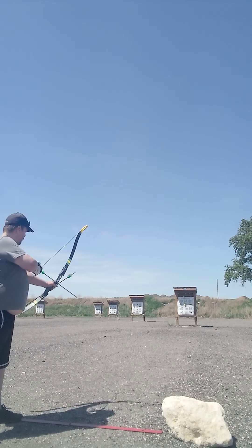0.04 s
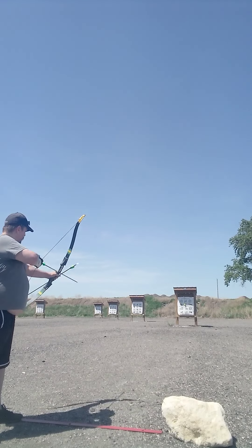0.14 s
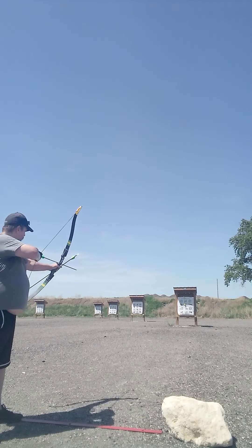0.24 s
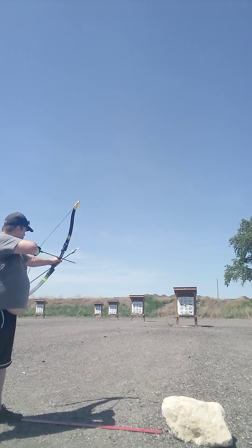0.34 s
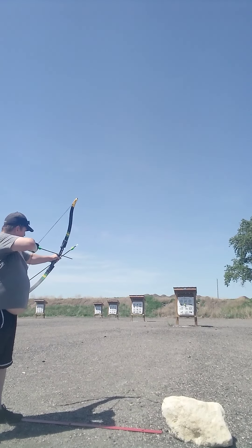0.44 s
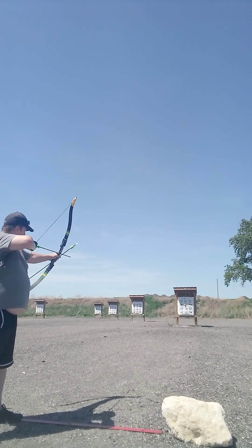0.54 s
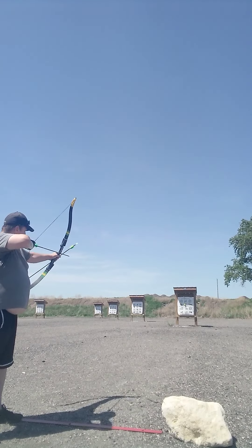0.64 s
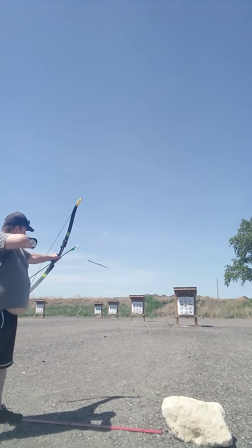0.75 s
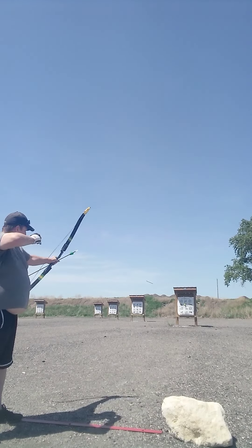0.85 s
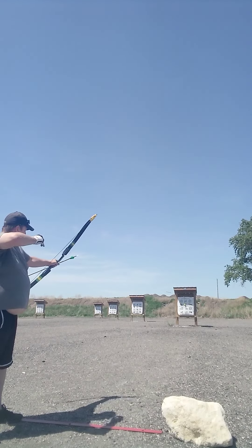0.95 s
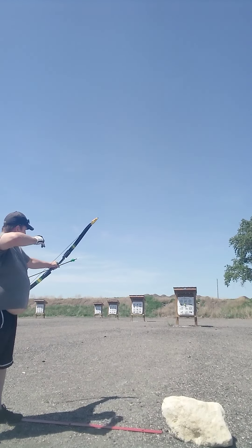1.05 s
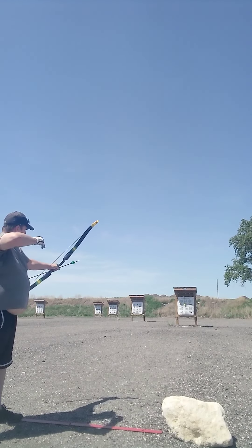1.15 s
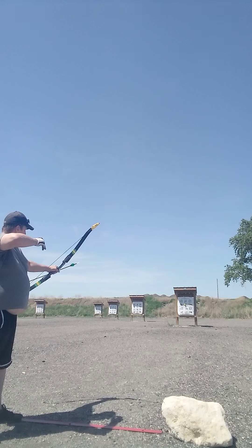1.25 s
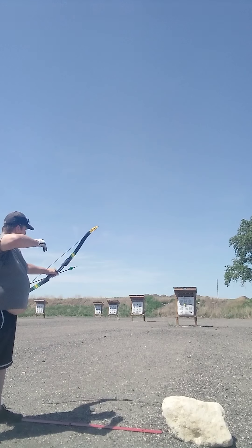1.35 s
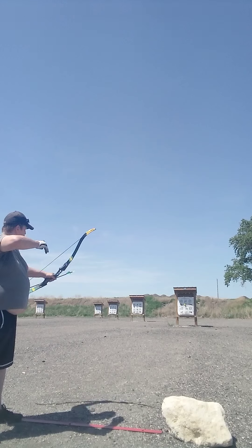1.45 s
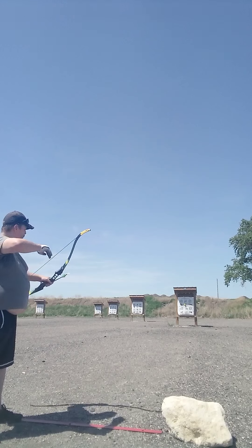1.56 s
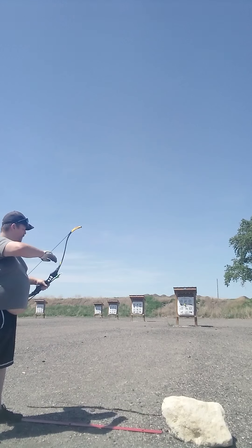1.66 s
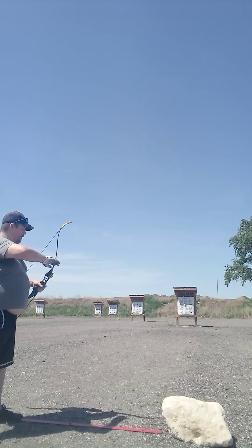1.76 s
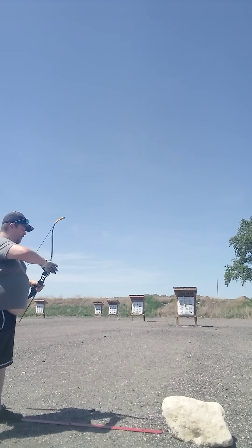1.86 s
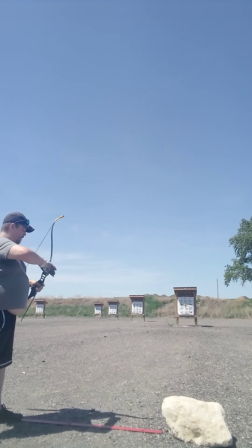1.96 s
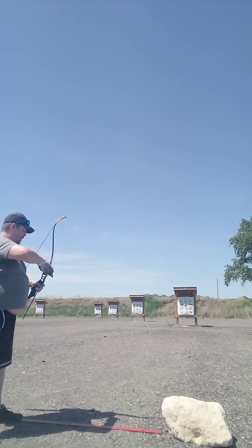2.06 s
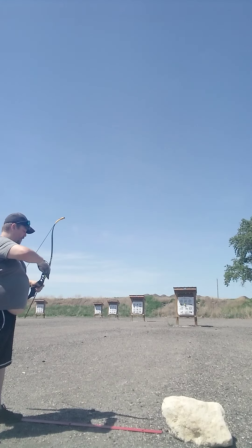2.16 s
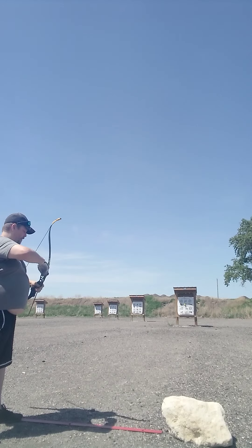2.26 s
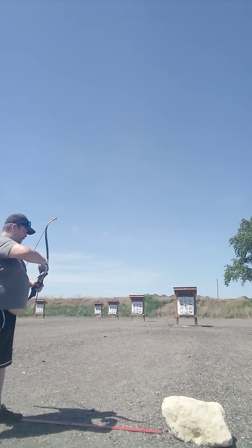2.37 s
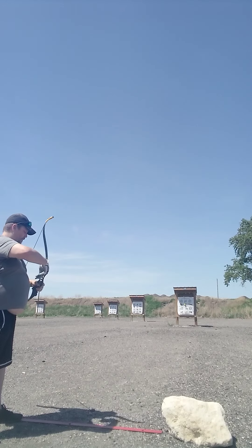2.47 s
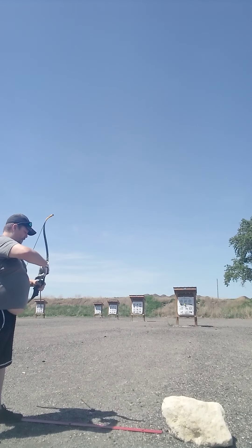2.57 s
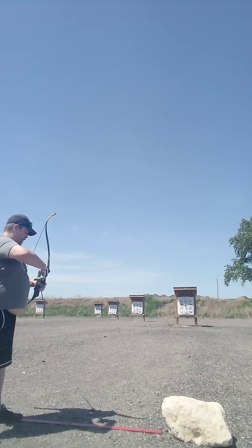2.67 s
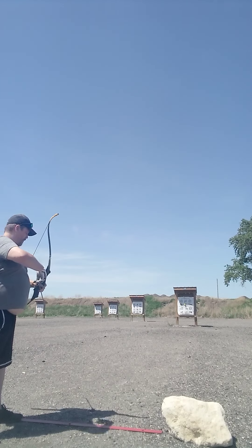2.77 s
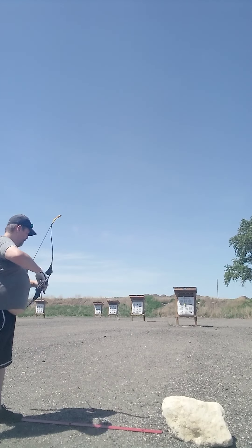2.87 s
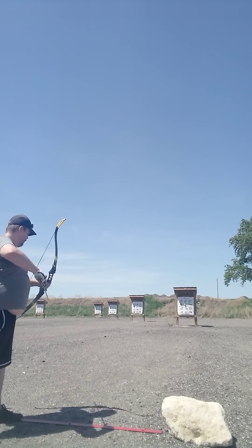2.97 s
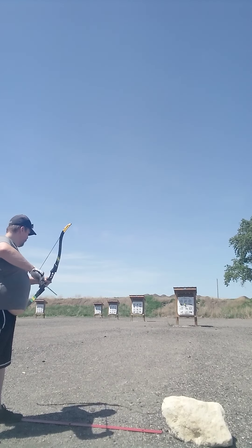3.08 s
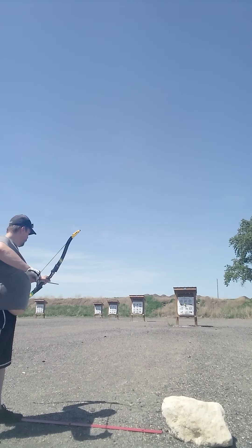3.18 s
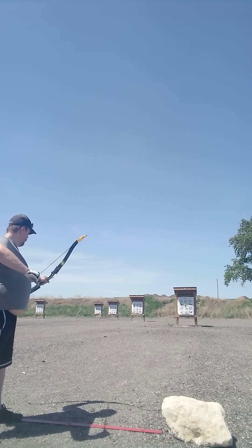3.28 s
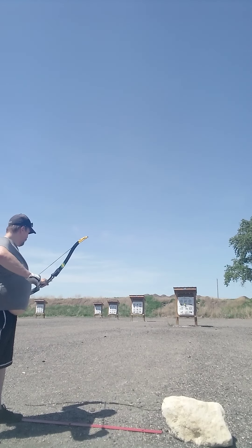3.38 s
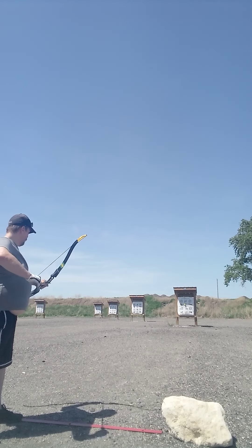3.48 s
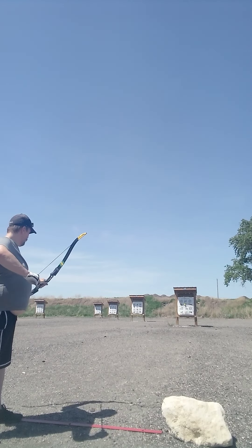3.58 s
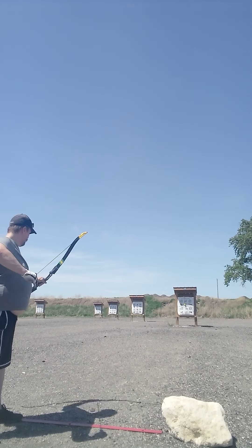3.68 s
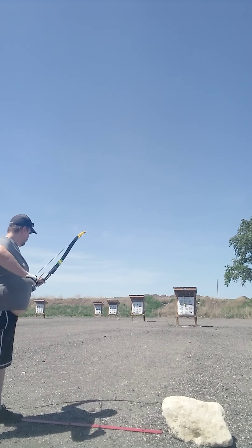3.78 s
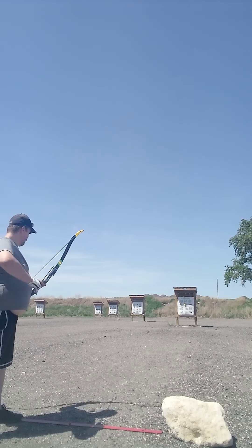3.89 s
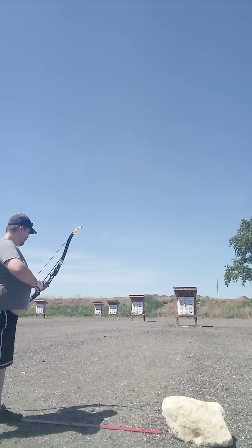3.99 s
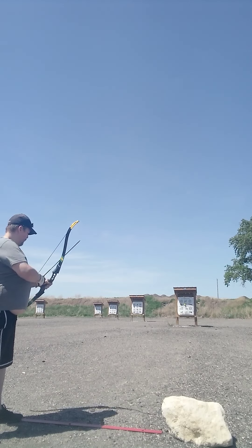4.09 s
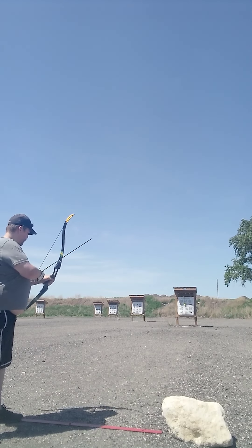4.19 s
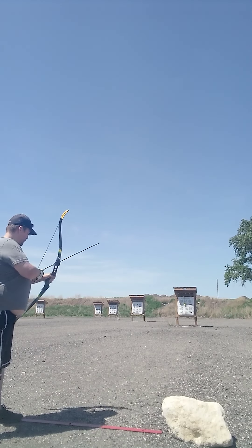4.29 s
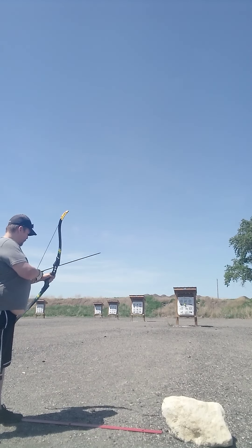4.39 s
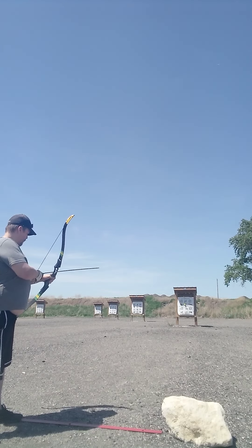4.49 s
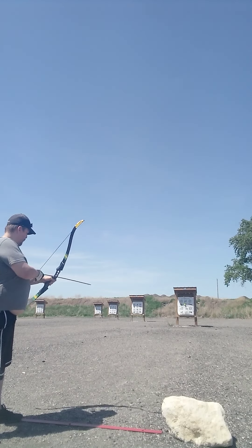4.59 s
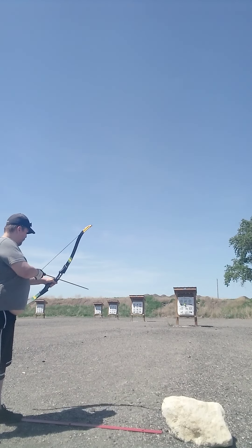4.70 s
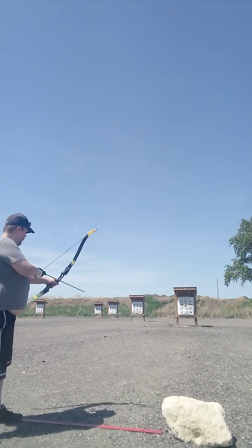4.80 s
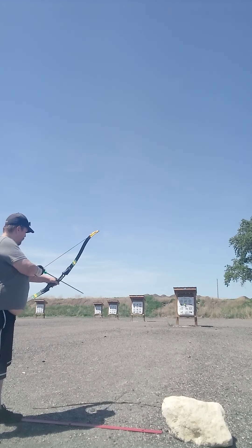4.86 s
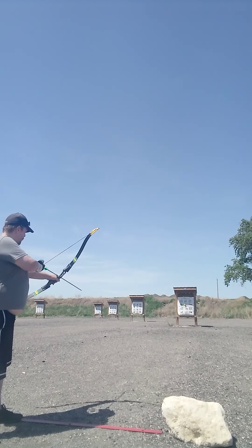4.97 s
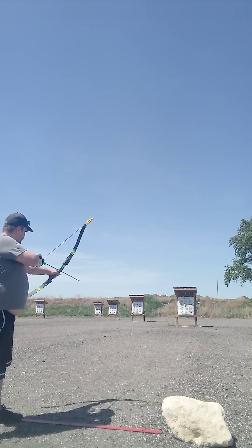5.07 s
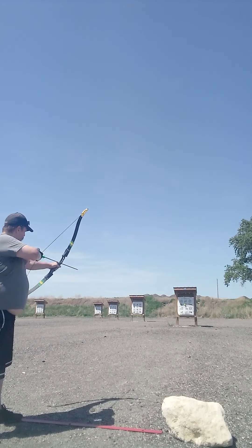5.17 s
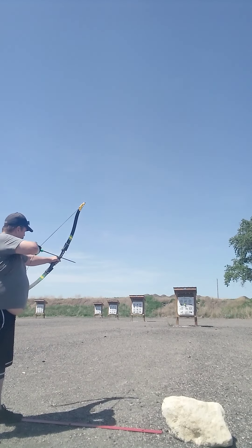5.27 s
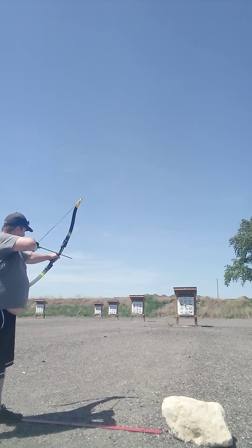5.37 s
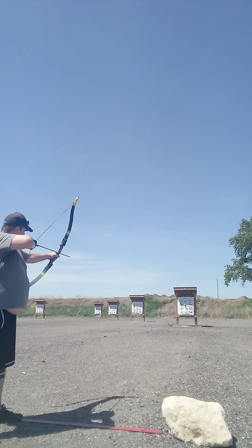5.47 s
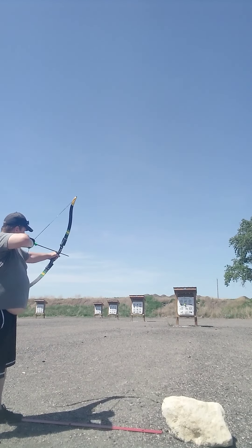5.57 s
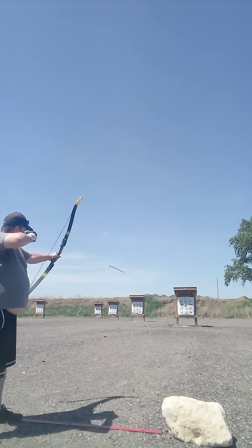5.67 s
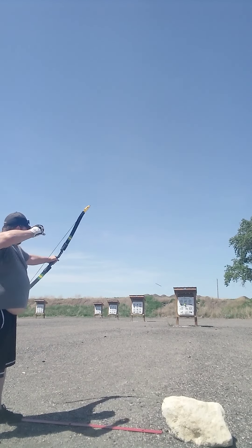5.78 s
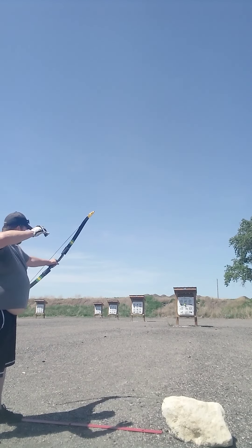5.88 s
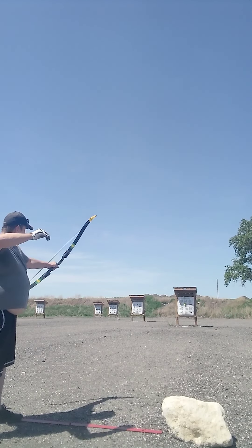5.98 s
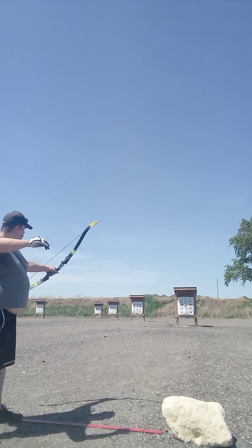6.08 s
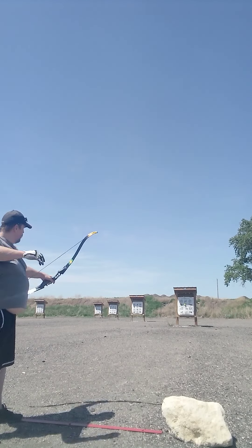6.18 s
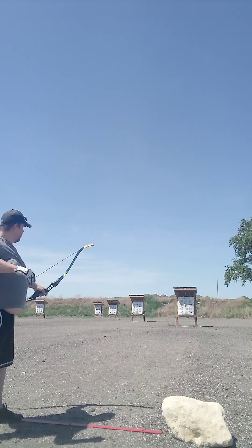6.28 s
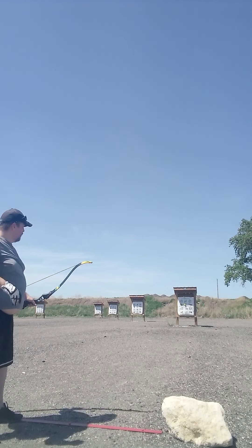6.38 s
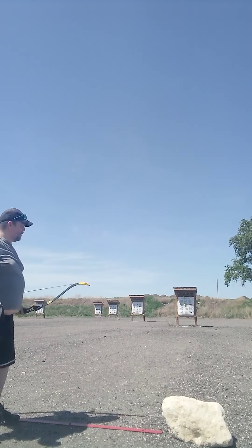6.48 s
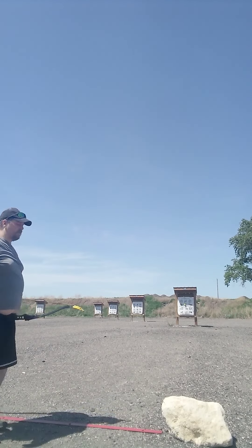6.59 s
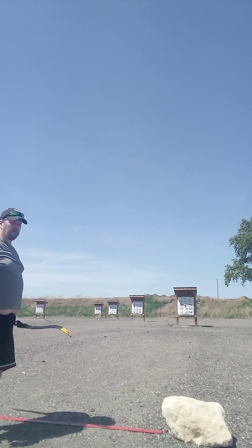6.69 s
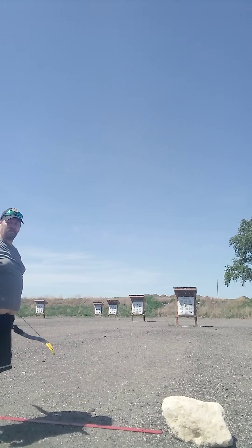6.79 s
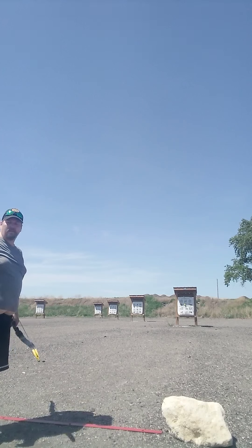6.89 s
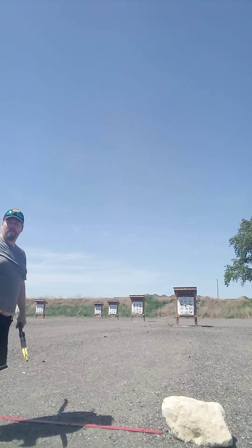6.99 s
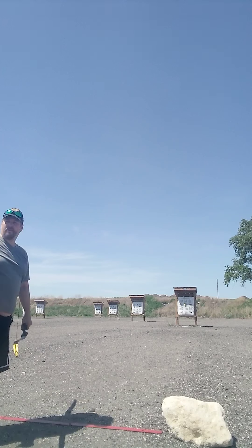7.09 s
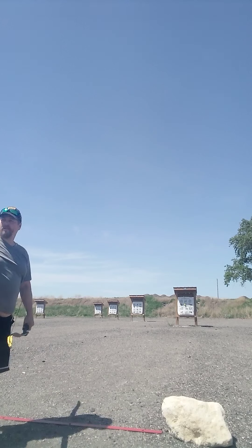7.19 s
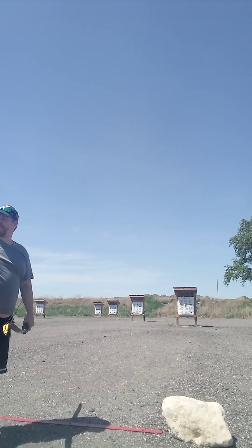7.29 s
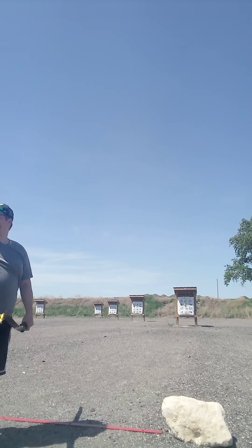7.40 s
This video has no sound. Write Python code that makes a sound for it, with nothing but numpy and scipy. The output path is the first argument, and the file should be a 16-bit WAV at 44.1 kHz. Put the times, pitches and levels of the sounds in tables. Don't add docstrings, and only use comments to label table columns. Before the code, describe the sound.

Close outdoor phone capture, a few metres from an archer: rumbling gusts and low far-road roar throughout. An early bow release cracks in a rapid cluster of slaps, leaving a dull open-air tail. Quiet handling follows, with thin squeaks, a crisp nock click, dry arrow ticks and high bird whistles. Another release snaps, a small distant target knock answers, and gravel steps and a last wind thump end it.

```python
import sys
import numpy as np
from scipy import signal
from scipy.fft import rfft, irfft, next_fast_len
from scipy.io import wavfile
from scipy.ndimage import uniform_filter1d

SR = 44100
rng = np.random.default_rng(int(sys.argv[2]) if len(sys.argv) > 2 else 0)


def unload_wav(signal):
    wavfile.write(
        sys.argv[1],
        SR,
        np.round(np.clip(np.atleast_2d(signal).T, -1, 1) * 32767).astype(np.int16),
    )


def volts_from_decibels(level):
    exponent = np.asarray(level, float) / 20
    return 10 ** exponent


N = 328382
T = np.arange(N) / SR

# time in seconds, traffic level in dB, stirring leaves level in dB,
# deep traffic above its usual share in dB.
ROAD_LEVELS = [(0, -66, -77.5, 0), (.35, -64, -77, 1), (.6, -66.5, -79.5, -1.5), (1.099, -62.5, -75.5, 0),
               (1.72, -62.5, -78, -1), (1.86, -64.5, -80.5, -10), (2.05, -69, -80, -2),
               (2.6, -69, -82.5, 0), (3.01, -65.5, -78, 0.5), (3.5, -68, -75, 0), (3.8, -69.5, -77.5, -0.5),
               (4.4, -69, -78, -0.5), (5.04, -64.5, -72.5, 2), (5.6, -63.5, -75, 1),
               (6.08, -66.5, -75.5, -0.5), (6.5, -67, -75, -1), (6.9, -63, -79, -0.5),
               (7.4, -66, -81.5, -1)]
LOOSE_S = [
    .828,
    5.733,
]


def colour(x, points):
    hz, db = np.transpose(points)
    size = next_fast_len(len(x))
    f = np.maximum(np.fft.rfftfreq(size, 1 / SR), 1)
    gain = volts_from_decibels(np.interp(np.log(f), np.log(hz), db))
    y = irfft(rfft(x, size) * gain, size)[:len(x)]
    return y / np.std(y)


def band(x, low_hz, high_hz, order=2):
    edges_hz = [low_hz, min(high_hz, .45 * SR)]
    return signal.sosfilt(signal.butter(order, edges_hz, "band", fs=SR, output="sos"), x)


def ring(x, hz, t60):
    pole = np.exp(2j * np.pi * hz / SR - np.log(1000) / (t60 * SR))
    return signal.lfilter([0, pole.imag], [1, -2 * pole.real, abs(pole) ** 2], x)


def ring_modes(x, modes):
    return sum(volts_from_decibels(db) * ring(x, hz, t60) for hz, db, t60 in modes)


def walk(rate):
    k = int(SR / rate)
    held = np.repeat(rng.standard_normal(N // k + 1), k)
    w = uniform_filter1d(uniform_filter1d(held, k), k)[:N]
    return w / np.std(w)


def peak(x):
    return x / np.abs(x).max()


def add(out, s, x):
    i = int(s * SR)
    out[i:i + len(x)] += x[:N - i]


def rub(ms, rise_ms, grain_db):
    t_ms = np.arange(4096) / SR * 1000
    grains = np.repeat(rng.standard_normal(256), 16)
    envelope = (1 - np.exp(-t_ms / rise_ms)) * np.exp(-t_ms / ms)
    return rng.standard_normal(4096) * volts_from_decibels(grain_db * grains) * envelope


def quick(x, ms):
    return x * np.exp(-np.arange(len(x)) / SR * 1000 / ms)


def top(x, edge_hz):
    # resonance in Hz, width in Hz, level in dB.
    port_modes = [(8100, 300, 0), (11120, 250, 1), (12300, 270, -6), (15500, 500, 13)]
    port = sum(0.072 * volts_from_decibels(db) * ring(x, hz, 0.89 / width_hz) for hz, width_hz, db in port_modes)
    return band(x + port, 7700, edge_hz, order=3)


def patches(x, depth_db, hold_s, width_hz, deep_db):
    z = signal.stft(x, nperseg=1024, noverlap=768)[2]
    field = rng.standard_normal(z.shape)
    field = uniform_filter1d(field, max(int(hold_s * SR / 256), 1), axis=1)
    field = uniform_filter1d(field, max(int(width_hz * 1024 / SR), 1), axis=0)
    gain = volts_from_decibels(depth_db * field / np.std(field))
    deep_hz = 830
    frame_s = np.arange(z.shape[1]) * 256 / SR
    gain[:int(deep_hz * 1024 / SR)] *= volts_from_decibels(np.interp(frame_s, np.transpose(ROAD_LEVELS)[0], deep_db))
    y = signal.istft(z * gain, nperseg=1024, noverlap=768)[1][:N]
    return y / np.std(y)


def road():
    # frequency in Hz, density in dB per Hz.
    roar_colour = [(180, -37.5), (300, -12.5), (407, -25), (544, -20), (688, -3), (1300, -5.5),
                   (1670, -17.5), (2110, -30.5)]
    leaves_colour = [(1670, -15), (1740, -23.5), (2110, -28), (3620, -23.5), (6130, -21), (7240, -35.5),
                     (8200, -52.5), (18000, -120)]
    # slope in dB per traffic dB, slope in dB per leaves dB, level in dB at -66 and -77.
    between = (1.34, 0.73, -77)
    # whine in Hz, width in Hz, level in dB, start in seconds, stop in seconds.
    whines = [(701, 14, -69.5, 0.9, 1.8), (700.5, 13.97, -73, 2.0, 4.2), (958, 9.2, -65, 0.6, 1.48),
              (1607, 36, -78.5, -0.8, 3.18), (7132, 73, -89.5, -0.3, 7.6), (7730, 33, -99.5, -1, 7.7),
              (484, 13, -76, 0.55, 1.15), (490, 20, -74, 1.3, 1.496), (600, 60, -72, 5.45, 5.7),
              (640, 58, -68.5, 5, 5.1), (1073, 120, -74, 4, 4.6), (1630, 150, -70.5, 1.6, 1.96)]
    s, traffic_db, leaves_db, deep_db = np.transpose(ROAD_LEVELS)
    between_db = between[0] * (traffic_db + 66) + between[1] * (leaves_db + 77) + between[2]

    hiss = band(rng.standard_normal(N), 14200, 15850, order=8)
    out = hiss / np.std(hiss) * volts_from_decibels(-99 + 1.6 * walk(3.2) + 1.8 * walk(25))
    out = out + volts_from_decibels(-100) * band(rng.standard_normal(N), 8180, 15850, order=6)

    regions = [
        (traffic_db, roar_colour, 382.0, 2100, 0.93, 3.37),
        (between_db, leaves_colour, 1726, 2447, 0.66, 4.6),
        (leaves_db, leaves_colour, 2680, 7550, 2.25, 4.7)]
    for db, points, low_hz, high_hz, trim_db, patchy_db in regions:
        part = band(colour(rng.standard_normal(N), points), low_hz, high_hz, order=3)
        swell = volts_from_decibels(np.interp(T, s, db) + trim_db + 1.35 * walk(9))
        out = out + patches(part, patchy_db, .07, 90, deep_db) * swell

    for hz, width_hz, db, start, stop in whines:
        tone = ring(rng.standard_normal(N), hz, 3.2 / width_hz)
        fade = np.clip(np.minimum(T - start, stop - T) / 0.054, 0, 1)
        out = out + tone / np.std(tone) * fade * volts_from_decibels(db + (2.5 + hz / 3500) * walk(11 + hz / 500))
    return out


def wind():
    # frequency in Hz, density in dB per Hz.
    low_colour = [(20, -36), (51, -1.5), (92, 3.5), (147, -2), (231, -21.5), (260, -40.5), (340, -35),
                  (570, -120)]
    # time in seconds, level in dB.
    breeze = [(0, -47.5), (.5, -58.5), (.9, -53.5), (1.03, -56), (1.6, -58.5), (2.1, -57), (2.9, -56),
              (3.2, -59), (3.5, -60), (3.88, -75.5), (4.05, -60), (5.0, -53.5), (5.4, -64), (5.7, -56.5),
              (6.45, -54), (6.65, -61.5), (7.2, -59), (7.45, -58)]
    # time in seconds, peak in dB, half length in seconds, upper rumble above it in dB.
    gusts = [(0.033, -41.5, 0.075, -3), (0.096, -45, 0.079, 2.5), (.14, -39.5, 0.045, 0),
             (.28, -46, 0.054, -5.5), (0.378, -47, 0.039, -4), (0.433, -41.5, 0.044, -5),
             (0.559, -42, 0.068, -21), (0.685, -43, 0.066, -23), (0.803, -47.5, 0.085, -6),
             (1.139, -42, 0.04, -12.5), (1.314, -42.5, 0.069, -12.5), (1.413, -51.5, 0.035, -2),
             (1.736, -50, 0.097, -36), (1.91, -46, 0.066, -10), (2.34, -45.5, 0.029, -13),
             (2.453, -44, 0.065, -17), (2.6, -53, 0.035, -25), (2.707, -50, 0.062, -3.5),
             (2.824, -60, 0.041, -33), (3.282, -43.5, 0.038, -19.5), (3.994, -54.5, 0.07, -27),
             (4.336, -51.5, 0.11, -32), (4.426, -52, .06, -29), (6.053, -46.5, .07, -23),
             (6.154, -48, 0.022, -18), (6.871, -51, 0.024, -32.5), (6.944, -50.5, 0.034, -33),
             (7.304, -49, 0.034, -36), (7.412, -34.5, 0.036, -8)]
    # start in seconds, peak in dB, pitch in Hz, length in cycles.
    eddies = [(0.026, -42, 86, 1.7), (0.073, -32, 109, 1.2), (0.101, -30, 139.6, 0.71),
              (0.126, -35.5, 129, 1.4), (0.146, -33.5, 144, 1.3), (0.34, -34.5, 116, 1.2),
              (0.359, -36, 148, 0.95), (0.394, -35.5, 121, 0.63), (0.42, -34.5, 140, 2.64),
              (0.786, -44, 181, 2.6), (1.128, -41, 89, 1.6), (1.309, -45, 131, 1.95),
              (1.402, -40.5, 125, 1.45), (1.893, -41, 88, 0.5), (2.43, -44, 130, 2.2),
              (2.697, -37.5, 73.4, 0.8), (2.73, -37.5, 87, 0.8), (3.27, -43, 75, 2.16),
              (5.8853, -35.5, 139, 1.1), (5.927, -45.5, 109, 2.6), (7.382, -39, 164, 2.3),
              (7.409, -39, 100, 1.1)]
    ripples = [(0.544, -39.5, 110, 2.2), (0.68, -47, 119, 2.2), (1.628, -47.5, 110, 2.2),
               (2.007, -44.5, 102, 2), (2.577, -38.5, 85, 2.5), (2.804, -45, 75.4, 2),
               (2.852, -45, 103, 2.2), (2.974, -45, 94.2, 2.4), (3.073, -47, 91.5, 2.4),
               (3.979, -43, 105, 2.9), (4.247, -44, 88.8, 2.5), (4.795, -47, 105, 2.1),
               (4.911, -45, 123, 2.4), (5.283, -54, 116, 2.1), (5.417, -52, 116, 2.8),
               (5.548, -54, 96.9, 2.2), (5.641, -50, 78.1, 2.2), (6.014, -41, 102, 2),
               (6.145, -38, 96.9, 2.2), (6.339, -44, 124, 2.3), (6.533, -44.5, 88.8, 2.4),
               (6.838, -43, 108, 2.5), (6.906, -51, 75.4, 2.2), (7.074, -51, 113, 2.2),
               (7.289, -44.5, 127, 2.7)]
    gust_fall_db, breeze_upper_db, ripple_db = 15.5, -30, -7

    t = T[::64]
    low_gain = volts_from_decibels(np.interp(t, *np.transpose(breeze)))
    up_gain = low_gain * volts_from_decibels(breeze_upper_db)
    for s, db, half_s, upper_db in gusts:
        away = np.abs(t - s) / half_s
        low_gain = np.hypot(low_gain, volts_from_decibels(db - gust_fall_db * away))
        up_gain = np.hypot(up_gain, volts_from_decibels(db + upper_db - 1.24 * gust_fall_db * away))
    low_gain, up_gain = np.interp(T, t, low_gain), np.interp(T, t, up_gain)

    flicker = walk(22)
    rumble = colour(rng.standard_normal(N), low_colour)
    deep = band(rumble, 15, 78, order=3) * volts_from_decibels(2.5 * walk(14) - 1.0)
    middle = band(rumble, 78, 600, order=3) * volts_from_decibels(3.2 * flicker)
    low = (deep + middle) * low_gain * volts_from_decibels(0.85)
    up = band(rng.standard_normal(N), 159.4, 283.0, order=3)
    out = low + up / np.std(up) * up_gain * volts_from_decibels(5.13 * flicker - 1.0)

    thumps = np.zeros(N)
    for table, trim_db in [(eddies, 0), (ripples, ripple_db)]:
        for s, db, hz, cycles in table:
            phase = np.arange(int(SR * cycles / hz)) / SR * hz
            swell = np.sin(np.pi * phase / cycles) ** 1.26
            add(thumps, s, volts_from_decibels(db + trim_db + 4.0) * np.sin(2 * np.pi * phase) * swell)

    residue = volts_from_decibels(-50) * band(rng.standard_normal(N), 30, 55.03)
    return band(out, 45.1, 900, order=1) + residue + band(thumps, 75, 750)


def feet():
    # start in seconds, peak in dB, length in ms.
    scuffs = [
        (1.348, -52, 50),
        (6.523, -68, 88),
        (6.699, -49, 84),
        (7.008, -51, 69),
        (7.022, -52, 17),
    ]
    # frequency in Hz, density in dB per Hz.
    grit_colour = [(250, -31), (500, 8.5), (1200, 8.5), (2500, -3), (6500, -6.5), (9000, -50)]
    shape = np.zeros(N)
    t_ms = np.arange(SR // 2) / SR * 1000
    for s, db, ms in scuffs:
        fall = np.exp(-t_ms / ms) + 1.2 * np.exp(-t_ms / 3.2)
        add(shape, s, volts_from_decibels(db - 11.5) * (1 - np.exp(-t_ms / 0.67)) * fall)
    grains = rng.standard_normal(N) * volts_from_decibels(1.8 * rng.exponential(size=N))
    return shape * colour(grains, grit_colour)


def bird():
    # start in seconds, length in seconds, pitch ratio, arch level in dB, tail level in dB.
    chirps = [(4.713, .06, 1.01, -64, -76), (4.84, 0.06, 0.97, -76, -72), (5.102, 0.064, 1.01, -62, -67),
              (5.228, 0.066, 1, -64, -64), (5.358, .056, 1.0, -63, -61.5), (6.228, .058, 1.03, -70, -64),
              (6.371, 0.057, 0.99, -72, -62)]
    # share of its length, pitch in Hz.
    tune = [(0, 3110), (.18, 3547), (.3, 3730), (.42, 3610), (.58, 3280), (.8, 3140), (1, 3140)]
    # start in seconds, length in seconds, start pitch in Hz, end pitch in Hz, peak in dB.
    upsweeps = [
        (4.361, .016, 3140, 4250, -60),
        (5.615, 0.026, 2500, 4330, -52),
    ]
    out = np.zeros(N)
    for s, length_s, ratio, arch_db, tail_db in chirps:
        u = np.arange(0, 1, 1 / (length_s * SR))
        hz = ratio * uniform_filter1d(np.interp(u, *np.transpose(tune)), 150)
        levels_db = [arch_db - 8, arch_db, arch_db + 2.0, arch_db - 10, tail_db]
        level = volts_from_decibels(np.interp(u, [.08, .22, .4, .5, .6], levels_db))
        add(out, s, np.sqrt(2 * np.sin(np.pi * u)) * level * np.sin(2 * np.pi * np.cumsum(hz) / SR))
    for s, length_s, start_hz, end_hz, db in upsweeps:
        u = np.arange(0, 1, 1 / (length_s * SR))
        hz = start_hz + (end_hz - start_hz) * u ** 1.3
        level = np.sqrt(2) * volts_from_decibels(db) * np.sin(np.pi * u ** 2.2)
        add(out, s, level * np.sin(2 * np.pi * np.cumsum(hz) / SR))
    out = out * volts_from_decibels(4 * walk(130) - 3)
    repeats = [(.005, -10), (.009, -17), (.015, -21), (.022, -25)]
    return out + sum(volts_from_decibels(db) * np.roll(out, int(s * SR)) for s, db in repeats)


def rustles():
    # start in seconds, length in seconds, level in dB, lowest Hz, highest Hz.
    brushes = [(0.132, 0.038, -66, 6970, 16000), (0.952, 0.016, -78, 6000, 13100),
               (2.985, 0.065, -67, 3200, 9230), (6.035, 0.12, -87, 10660, 12370),
               (6.526, 0.023, -70, 5400, 9200)]
    out = np.zeros(N)
    for s, length_s, db, low_hz, high_hz in brushes:
        size = int(length_s * SR)
        add(out, s, volts_from_decibels(db - 15) * band(rng.standard_normal(size), low_hz, high_hz) * np.hanning(size))
        for when, pitch, drop, last in rng.random((10, 4)):
            t = np.arange(int(SR * (0.0057 + 0.011 * last))) / SR
            hz = low_hz + pitch * (high_hz - low_hz)
            tone = np.sin(2 * np.pi * hz * t) * np.hanning(len(t))
            add(out, s + 0.81 * when * length_s, volts_from_decibels(db - 20 * drop) * tone)
    return out


def squeaks():
    # start in seconds, length in seconds, pitch in Hz, level in dB.
    slips = [(1.64, .02, 9050, -92), (1.7, .035, 9050, -92), (2.93, 0.064, 7100, -76),
             (2.972, .035, 8850, -85), (2.976, .035, 11500, -86), (2.984, .018, 5000, -68),
             (2.99, .025, 7840, -75), (3.0, 0.015, 5500, -63), (3.0, .014, 6400, -67),
             (3.0, .02, 9950, -86), (2.99, 0.042, 11250, -89), (3.012, .04, 7710, -80),
             (3.16, 0.027, 7350, -80), (3.19, .04, 6150, -76), (3.215, .06, 7100, -81),
             (3.125, .015, 12400, -88), (3.068, .04, 10400, -89), (3.116, .014, 12000, -85),
             (3.138, .05, 7200, -78), (3.14, 0.054, 5900, -73)]
    out = np.zeros(N)
    for s, length_s, hz, db in slips:
        size = int(length_s * SR)
        tone = ring(rng.standard_normal(4096), hz, 0.021)[-size:]
        add(out, s, volts_from_decibels(db - 2.0) * np.hanning(size) ** 0.46 * tone / np.std(tone))
    return out


def rebound(x, again_db):
    again = x * rng.choice([-1, 1], 4096)
    return x + volts_from_decibels(again_db) * np.roll(again, int(6.5 * SR / 1000))


def arrows():
    # time in seconds, peak in dB, ring in Hz, top above peak in dB, ring above peak in dB.
    ticks = [(3.006, -49.5, 5200, -26, -22), (3.458, -25.5, 2930, -33, -21), (3.484, -43, 3480, -34, -13),
             (3.67, -41, 2900, -38, -18), (3.7293, -40, 3010, -38, -16), (4.6084, -32, 3090, -34, -8),
             (4.6892, -34.5, 3690, -23, -11.5), (4.707, -46.5, 3730, -33, -17),
             (4.7722, -38.5, 2700, -23, -5.5), (4.8632, -51, 4020, -40, -7.5),
             (4.9854, -39, 3650, -28, -21), (5.079, -34.5, 4250, -32, -9), (5.168, -36, 3400, -32, -17),
             (5.249, -48, 3600, -40, -20), (5.257, -43, 3230, -40.5, -20), (5.405, -43.5, 3200, -43.5, -10),
             (5.8727, -59, 4130, -6, -22), (6.523, -49.5, 4000, -31, -24)]
    tick_modes_hz = [(5670, 5500, 5800, 3800), (5160, 6140, 4300, 6960), (4040, 3600, 5100, 4600),
                     (2870, 6310, 3940, 7000), (3470, 4800, 4900, 5300), (3630, 4150, 3120, 2480),
                     (3730, 3270, 4350, 6900), (4930, 2800, 3300, 6330), (3900, 3150, 2800, 3420),
                     (3960, 2840, 5400, 6400), (4820, 2870, 4070, 3500), (4220, 2840, 3300, 7020),
                     (3490, 6930, 5100, 6240), (3650, 4800, 2900, 4200), (3840, 3600, 4700, 4220),
                     (4900, 3650, 3210, 4180), (5150, 2350, 5680, 6050), (5940, 6100, 7200, 4480)]
    rebounds_db = [-2, -28, -20, -12, -9.5, -22, -16, -8, -15, -8, -1.5, -7, -10, -18, -18, -6, -20, 0]
    # time in seconds, peak in dB, top above peak in dB, length in ms,
    # ring above peak in dB.
    nock = [
        (3.371, -25.5, -16.5, 0.82, -27.5),
        (3.372, -21, 1, 1.8, -17.5),
        (3.379, -28.5, -4.5, 0.77, -7),
    ]
    nock_modes_hz = [4850, 6440, 5200, 2900]
    nock_hz, tick_ms, mode_step_db, mode_t60_s = 4832, 2.75, -2.5, 0.012

    contacts = [(s, db, nock_hz, top_db, ring_db, ms, nock_modes_hz, -30)
                for s, db, top_db, ms, ring_db in nock]
    contacts += [(*row, tick_ms, modes_hz, again_db)
                 for row, modes_hz, again_db in zip(ticks, tick_modes_hz, rebounds_db)]
    out = np.zeros(N)
    for s, db, hz, top_db, ring_db, ms, modes_hz, again_db in contacts:
        contact = rub(ms, 0.25, 2.6)
        edge_hz = np.clip(16500 + 450 * (db + 27), 10500, 16500)
        touch = rebound(contact, again_db)
        body = sum(volts_from_decibels(mode_step_db * k) * ring(touch, f, mode_t60_s) for k, f in enumerate(modes_hz))
        body = peak(band(body, 1400, 0.85 * edge_hz))
        tick = peak(body + 0.8 * peak(band(touch, 2200, 0.48 * edge_hz, order=3)))
        knock = max(db + 32.5, 0) * 0.035 * peak(band(quick(contact, 2.5), 800, 2530))
        held = volts_from_decibels(ring_db) * peak(ring(quick(contact, 3.0), hz, .055 * (3000 / hz) ** 2))
        scatter = volts_from_decibels(-16.5) * band(rub(11.0, 2.2, 3.03), 2300, 6400, order=4)
        bright = volts_from_decibels(top_db + 6) * peak(top(rebound(quick(contact, 1.6), again_db), edge_hz))
        add(out, s, volts_from_decibels(db - 2.0) * (tick + knock + held + scatter + bright))
    return band(out, 1930, 16000, order=3) + volts_from_decibels(-12) * band(out, 800, 2000)


def echoes():
    returns = [  # dB, fall s, low Hz, high Hz
        (-54, 0.086, 260, 620),
        (-65, .06, 1000, 6500),
        (-66, .018, 14300, 16200)]
    out = np.zeros(N)
    t = T[:SR // 2]
    for s in LOOSE_S:
        for db, fall_s, low_hz, high_hz in returns:
            noise = band(rng.standard_normal(len(t)), low_hz, high_hz, order=4)
            envelope = (1 - np.exp(-t / .006)) * np.exp(-t / fall_s)
            add(out, s + .03, volts_from_decibels(db) * noise / np.std(noise) * envelope)
    return out


def target():
    # pitch in Hz, level in dB, t60 in seconds.
    board = [(250, -10.5, 0.041), (494, -9, 0.0071), (1160, 10, 0.002), (2160, -5, 0.0093),
             (3970, 3.5, 0.0038), (5330, -3.5, .005), (11600, 1, 0.0047)]
    thud_s, thud_db, bounce_ms, bounce_db = 6.2488, -25.5, 1.9, -20
    blow, out = np.zeros(4096), np.zeros(N)
    add(blow, 0, -np.hanning(14) / 6)
    add(blow, .0006, 1.46 * np.hanning(7) / 3)
    sound = ring_modes(blow, board)
    add(out, thud_s, sound)
    add(out, thud_s + bounce_ms / 1000, volts_from_decibels(bounce_db) * sound)
    tear = peak(band(rub(0.42, 0.14, 2.1), 3600, 17000, order=1))
    add(out, thud_s + 0.0004, volts_from_decibels(-10.5) * tear)
    dull = volts_from_decibels(-7.0) * band(rub(21.0, 0.35, 2.1), 500, 1320)
    thin = volts_from_decibels(-16.5) * band(rub(7.7, 0.73, 3.3), 2600, 5300)
    add(out, thud_s + .002, dull + thin)
    return volts_from_decibels(thud_db) * band(out, 107, 16000, order=1)


def bow():
    # time in seconds, peak in dB, top above peak in dB, length in ms,
    # limb blow in dB.
    snaps = [(0.8328, -48, -14, 1.5, -52), (0.835, -38, -20, 2, -57), (0.8445, -32, -9, 1.5, -47),
             (0.8491, -34, -12.5, 2.5, -33.5), (0.8556, -32.5, -16, 1.6, -35),
             (0.8576, -27, -1, 1.5, -35.5), (0.861, -32.5, -20, 1.5, -45), (0.8644, -26, -3.5, 1.4, -31.5),
             (0.867, -26.5, -11, 2, -39), (0.8745, -37.5, -20, 2.3, -35.5), (0.881, -40, -22, 3.8, -46),
             (0.8921, -41, -20, 2.1, -39), (5.7381, -37.5, -17, 3.9, -55), (5.7457, -39, -2, 1, -54),
             (5.7476, -28.5, -15, 2, -55), (5.754, -30, -20, 1.5, -39.5), (5.756, -25.5, -3.5, 1.2, -30.5),
             (5.7632, -28.5, -14, 1.3, -31.5), (5.7699, -27.5, -5, 1.4, -31), (5.7722, -31, -8, 1.5, -35.5)]
    snap_hz = [4000, 3520, 3200, 4700, 5200, 6300, 3200, 5200, 2690, 5300, 5200, 5200, 3000, 7000, 5840,
               3000, 4300, 3600, 6300, 2600]
    # frequency in Hz, density in dB per Hz.
    snap_colour = [(880, -15), (1500, -16.5), (2090, -7.5), (2800, -5), (5110, -2.5), (8500, -5.5),
                   (11000, -40.5), (18700, -120)]
    # pitch in Hz, level in dB, t60 in seconds.
    riser_modes = [(2690, 3, 0.016), (3500, -2.5, 0.012), (4250, -4.5, 0.01), (5200, 0, 0.015),
                   (6520, 2.5, 0.011)]
    limb_modes = [(110, -20, 0.32), (227.6, -15.5, 0.2), (333.4, -14, 0.14), (421, -19, 0.14),
                  (501, -2, 0.15), (653, -16, 0.098)]
    brace_modes = [(225.7, -7, 0.38), (250, -1, .045)]
    tip_modes = [(678, -5, 0.1), (767, -2.5, 0.081), (873, -13, 0.076), (1069, -2, 0.056),
                 (1250, -12, 0.061)]
    # time in seconds, level in dB.
    brace = [
        (0.8494, -33),
        (5.7545, -31),
    ]
    settle = [
        (.866, -34.5),
        (5.771, -33),
    ]
    riser_shift = 0.065

    hiss, high, push, tail, after, riser = np.zeros((6, N))
    for (s, db, top_db, ms, blow_db), main_hz in zip(snaps, snap_hz):
        contact = peak(rub(ms, 0.43, 2.25))
        add(hiss, s, volts_from_decibels(db) * contact)
        shift = rng.standard_normal((len(riser_modes), 2))
        for (hz, mode_db, t60), (a, b) in zip(riser_modes, shift):
            mode = ring(contact, hz * (1 + riser_shift * a), t60)
            add(riser, s, volts_from_decibels(db) * 0.03 * volts_from_decibels(mode_db + 2.49 * b) * mode)
        add(riser, s, volts_from_decibels(db - 8) * peak(ring(contact, main_hz, .007)))
        add(high, s, volts_from_decibels(db + top_db + 2.5) * quick(contact, 1.6))
        add(push, s + 0.00028, volts_from_decibels(blow_db) * np.hanning(18) / 9)
        add(tail, s, volts_from_decibels(blow_db - 4.5) * rub(40.4, 2.4, 1.4))

    for s in LOOSE_S:
        add(after, s, volts_from_decibels(-22.5) * rub(22, 25, 1.8))
        chatter = np.hanning(2000) ** .6 * rub(90, 1, 4.5)[:2000]
        add(after, s + .004, volts_from_decibels(-23) * chatter)

    click = colour(np.arange(4096) == 2048, snap_colour)[2048 - 64:2048 + 64]
    hiss = np.convolve(hiss, click / np.linalg.norm(click), "same")
    riser = band(riser, 1900, 9900)
    for s in LOOSE_S:
        add(riser, s, volts_from_decibels(-43.5) * np.hanning(500) * np.sin(2 * np.pi * 640 * T[:500]))

    slap, taut = np.zeros((2, N))
    for s, db in brace:
        add(taut, s, volts_from_decibels(db) * np.hanning(40) / 20)
    for s, db in settle:
        add(slap, s, volts_from_decibels(db) * np.hanning(14) / 7)
    limbs = band(ring_modes(push, limb_modes), 70.1, 6000)
    limbs = limbs + ring_modes(taut, brace_modes) + ring_modes(slap, tip_modes)

    treble = 1.14 * top(high, 16600) + volts_from_decibels(-3.0) * band(high, 900, 9500, order=1)
    scatter = band(tail, 370, 1000) + 3.06 * band(tail, 170, 500)
    scatter = scatter + volts_from_decibels(-43.0) * band(tail, 1300, 6000, order=3)
    away = volts_from_decibels(-20.5) * band(after, 1100, 6800, order=3)
    return 0.78 * hiss + riser + treble + limbs + scatter + away


def scene():
    ends = np.clip(np.minimum(T, T[-1] - T) / .004, 0, 1)
    background = road() + wind() + feet() + bird()
    handling = rustles() + squeaks() + arrows()
    shots = echoes() + target() + bow()
    return (ends * (background + handling + shots))[None]


def top_cut(x):
    return signal.sosfilt(signal.butter(12, 17020, fs=SR, output="sos"), x)


def record(dry):
    low_pass = signal.ellip(6, .5, 40, 16500, fs=SR, output="sos")
    mix = signal.sosfilt(low_pass, dry)
    return top_cut(mix)


dry = scene()
out = record(dry)
unload_wav(out)
```